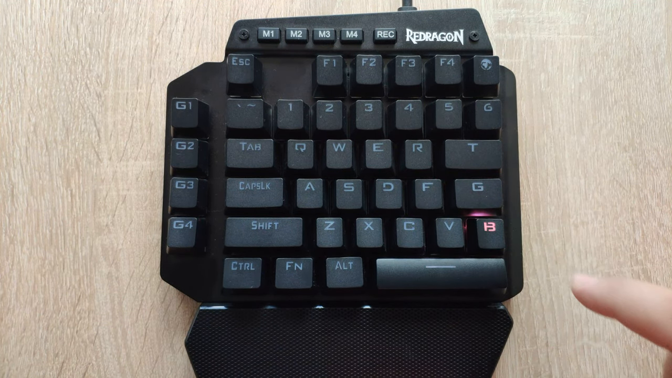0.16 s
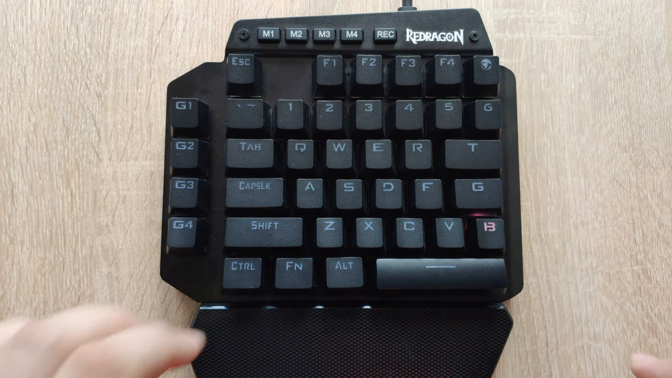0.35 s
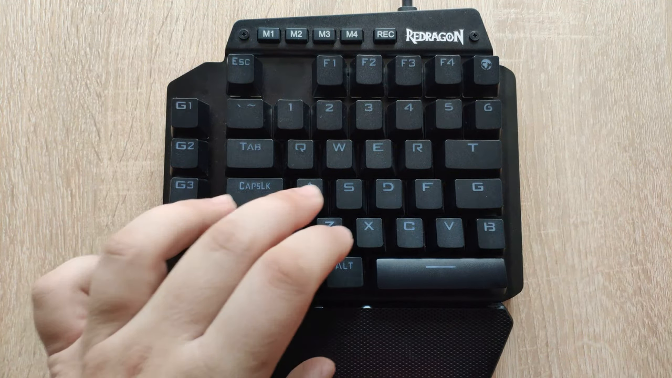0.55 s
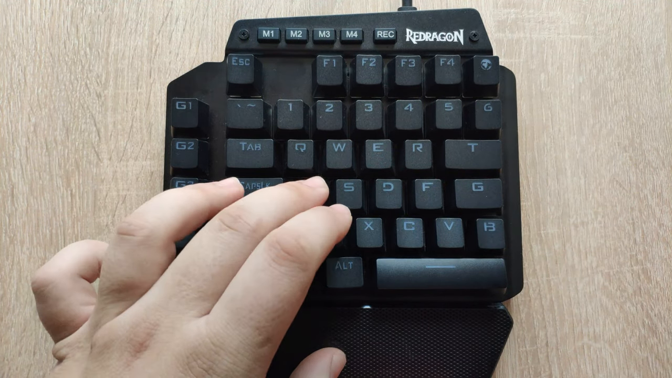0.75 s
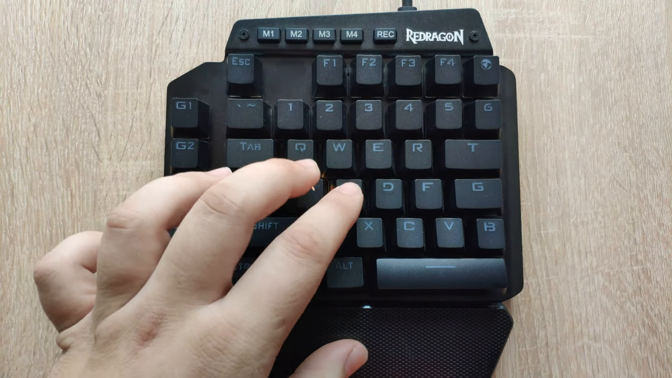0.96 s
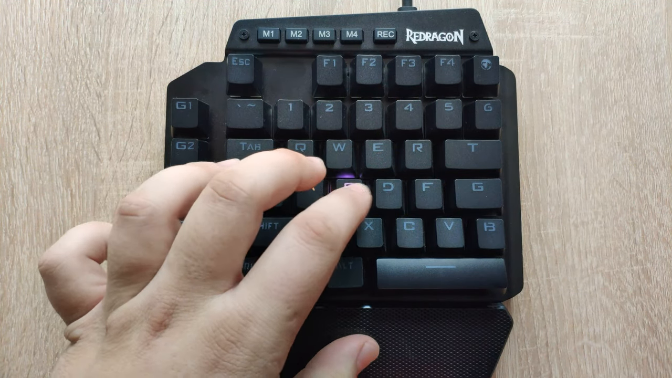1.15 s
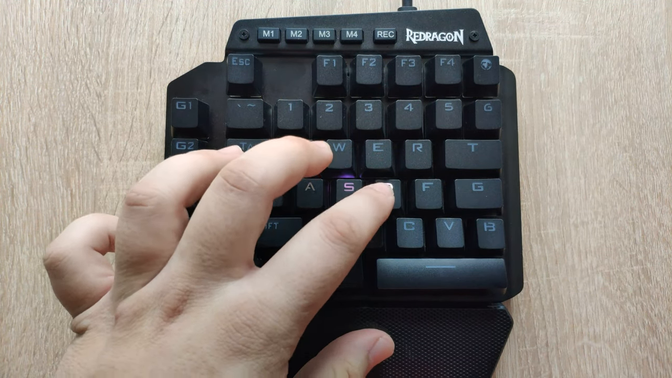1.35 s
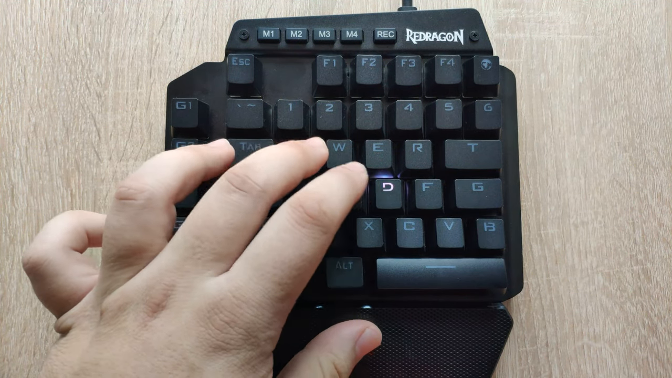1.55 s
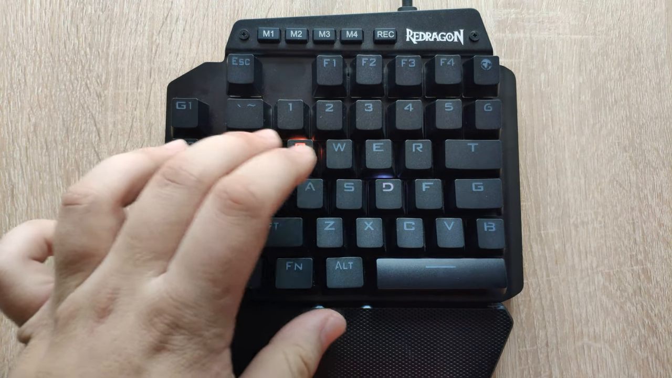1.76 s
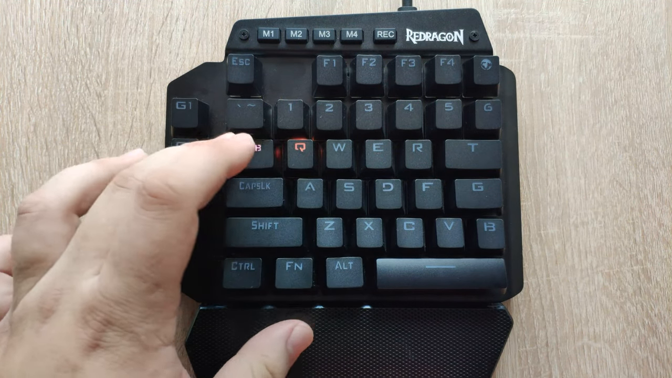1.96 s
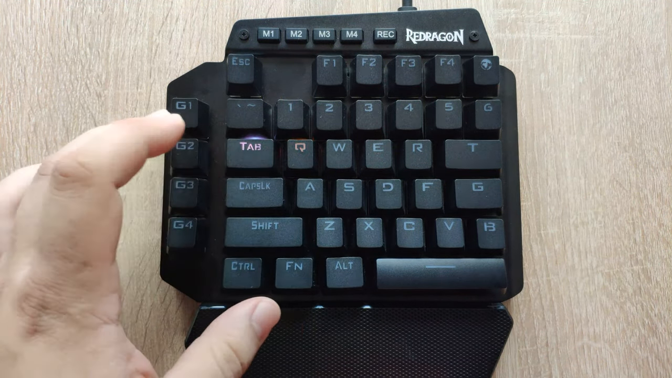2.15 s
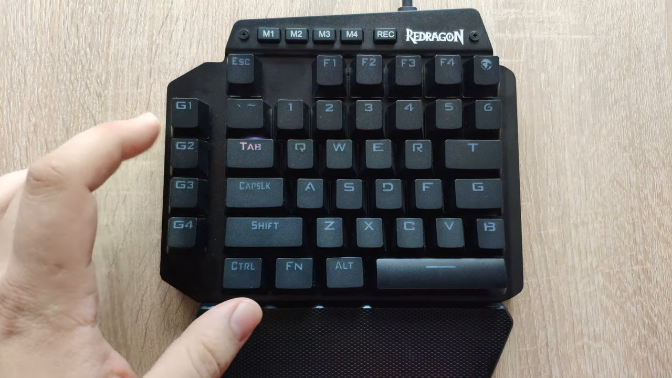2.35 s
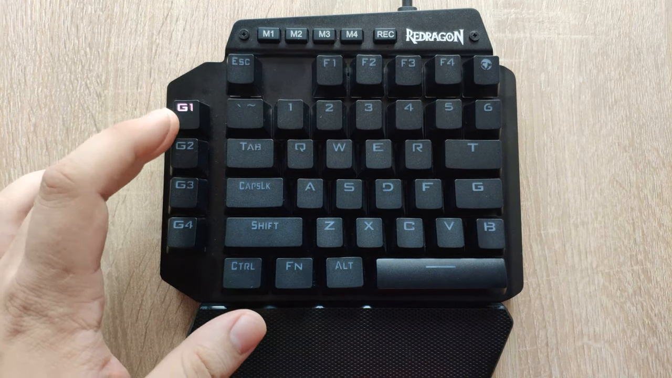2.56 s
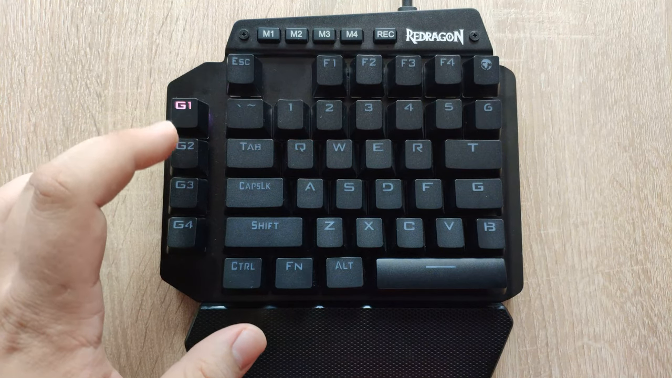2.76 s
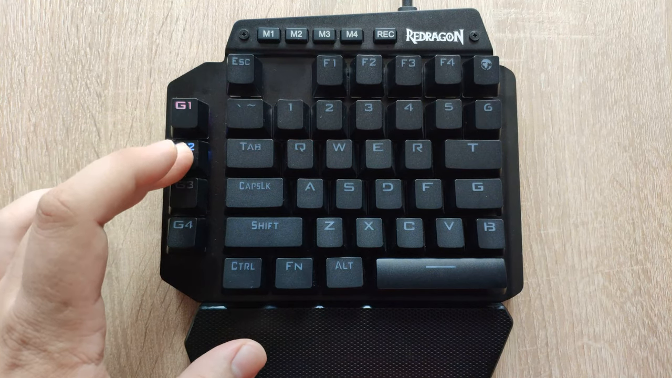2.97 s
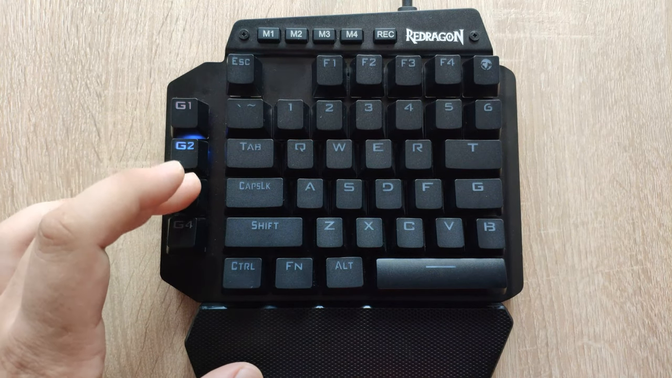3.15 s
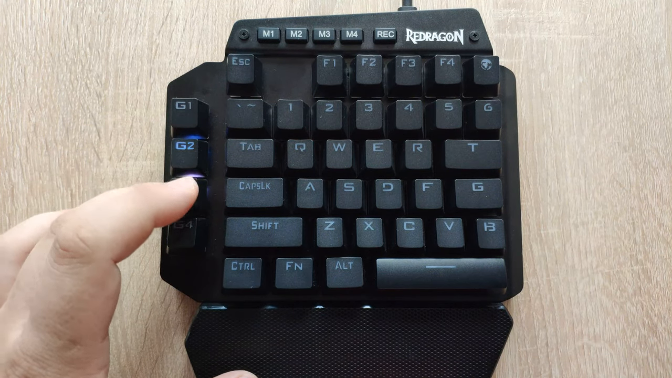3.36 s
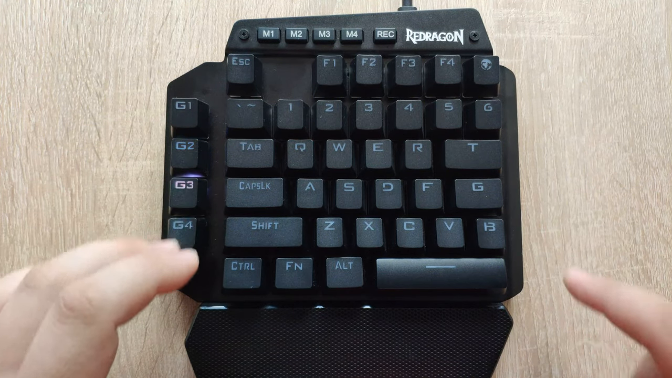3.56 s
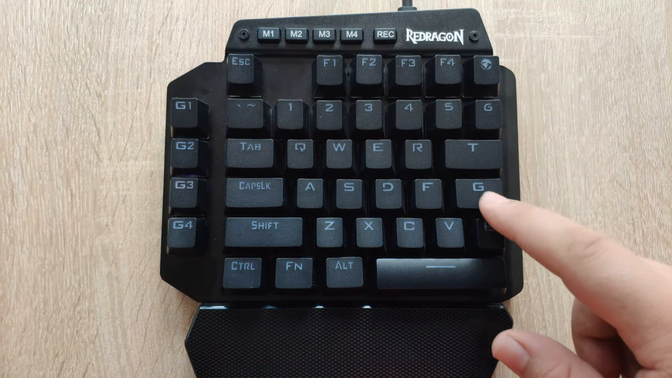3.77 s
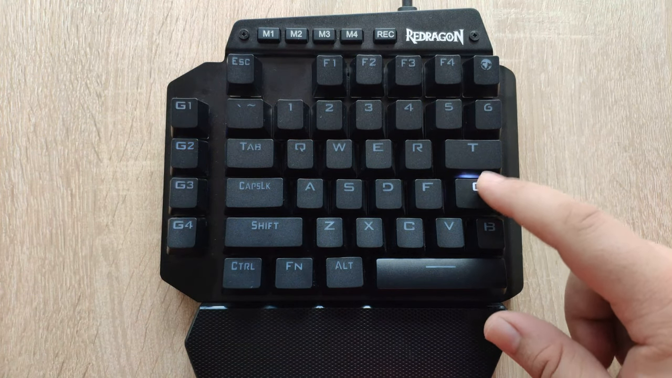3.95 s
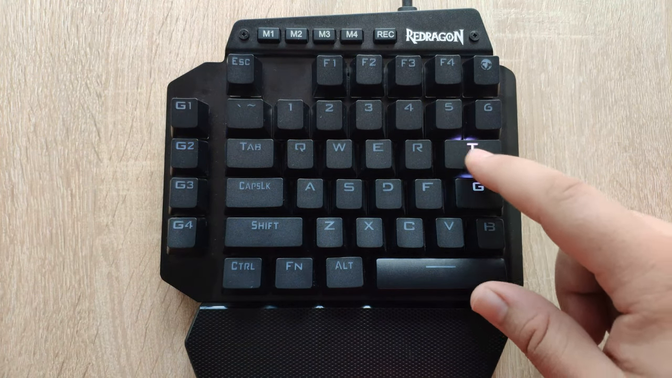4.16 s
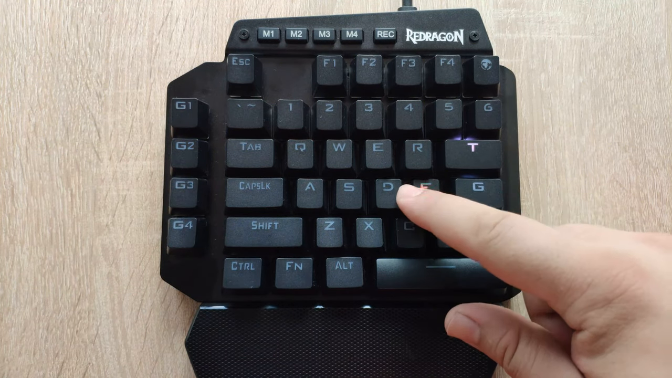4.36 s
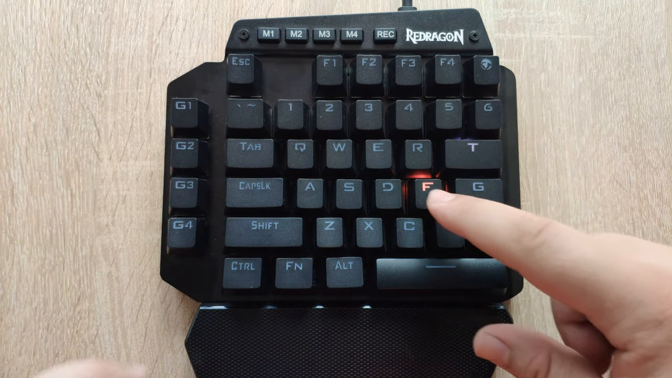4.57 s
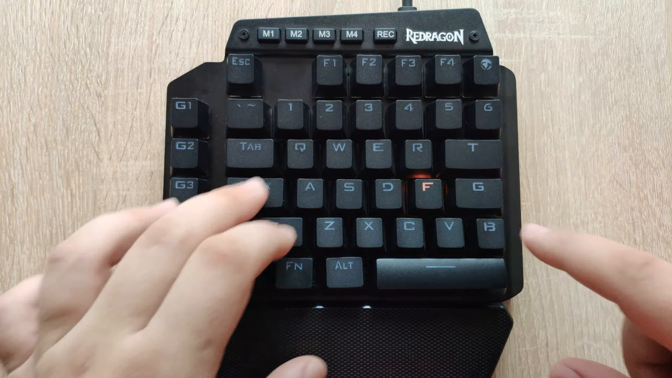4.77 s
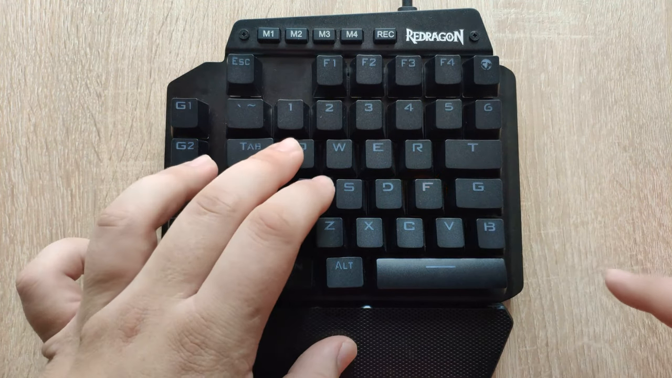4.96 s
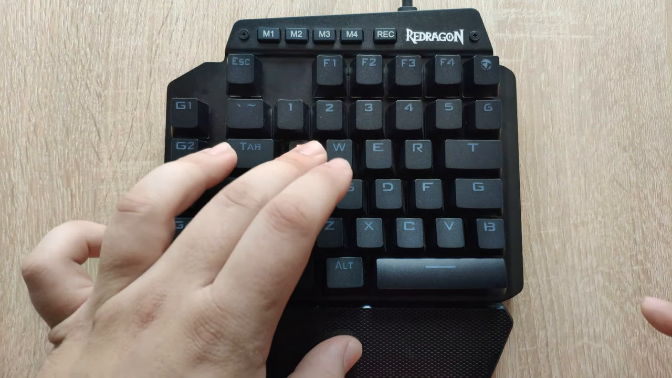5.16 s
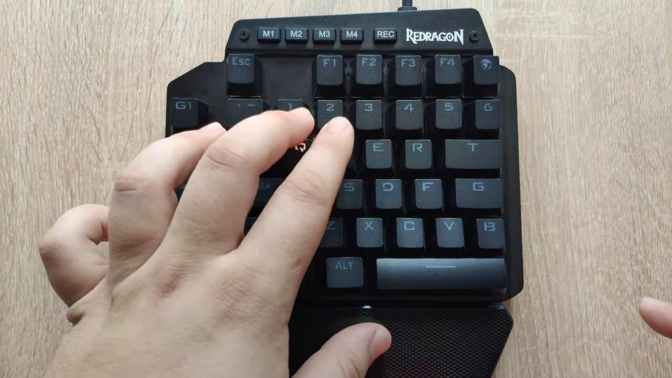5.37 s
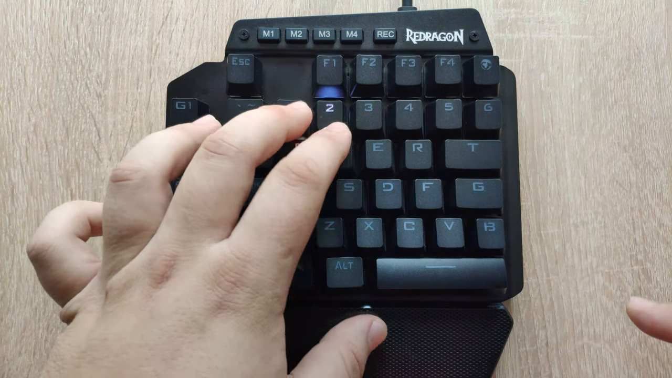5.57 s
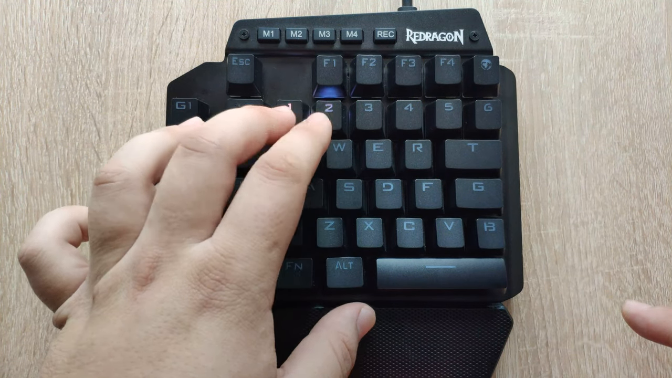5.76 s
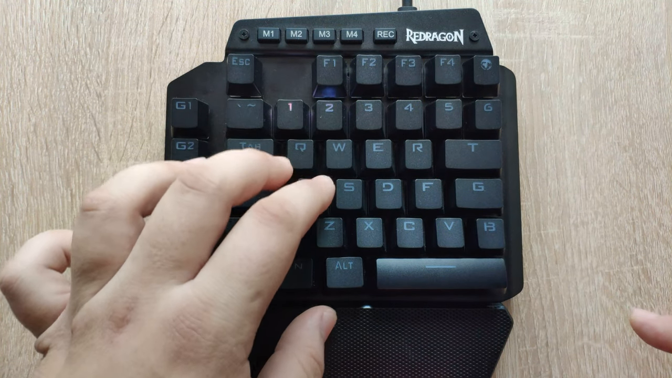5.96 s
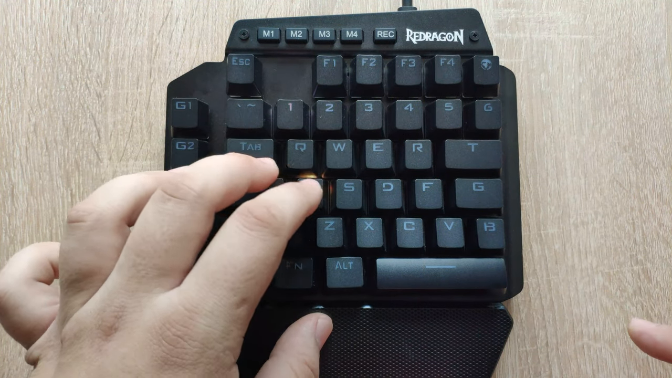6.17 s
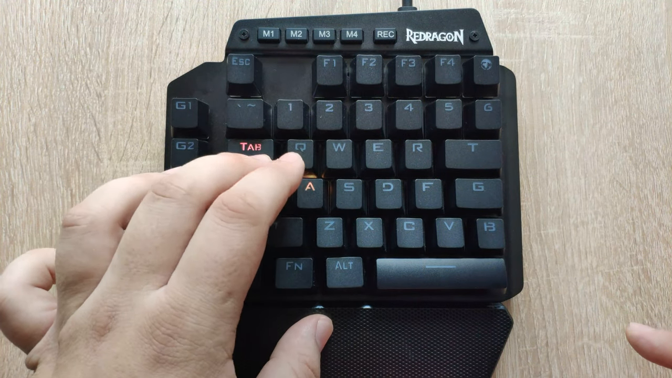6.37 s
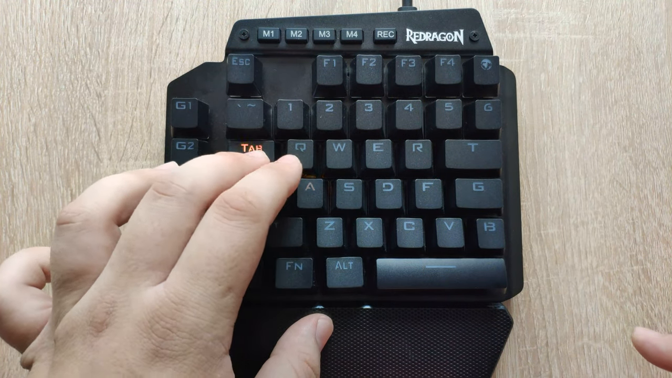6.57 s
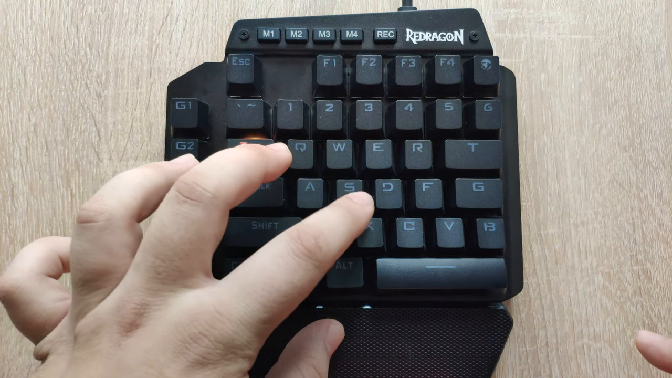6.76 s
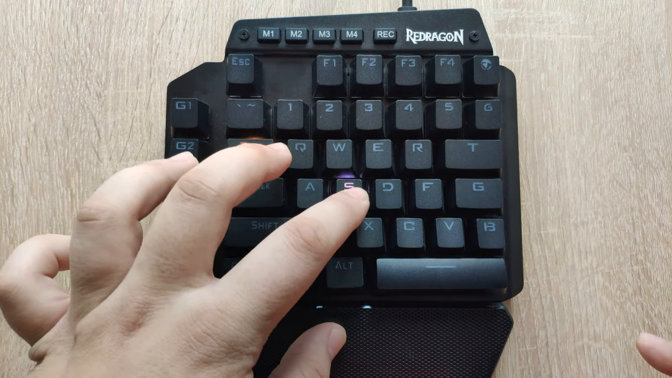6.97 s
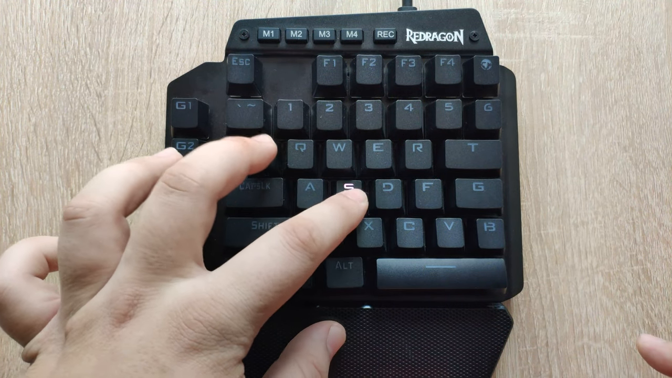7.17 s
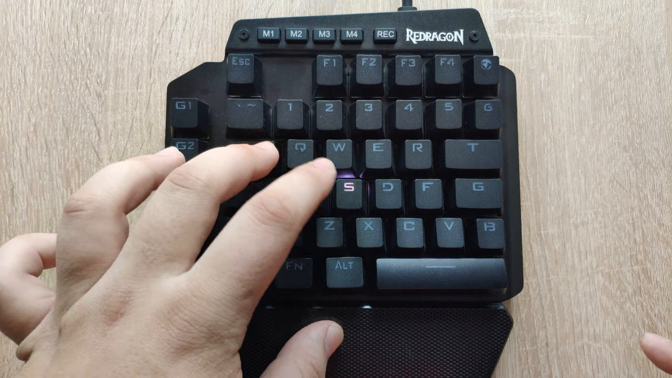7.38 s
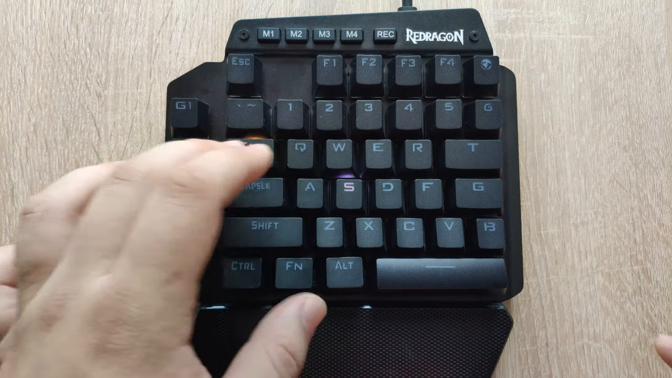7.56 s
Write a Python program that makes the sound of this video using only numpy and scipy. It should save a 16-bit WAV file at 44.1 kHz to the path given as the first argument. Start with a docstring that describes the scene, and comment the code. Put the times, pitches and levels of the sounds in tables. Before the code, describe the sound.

Mechanical keyboard keys click crisply and clack back up, about three presses a second with a few short pauses.

```python
"""Sharp clicks and clacks: one hand presses the keys of a small mechanical keypad on a wooden desk.
On each press the switch's click jacket snaps, and a firm press bottoms the keycap out on the plate; on
release the key knocks against its top stop. Fingers land and stems tick in between. Each impact excites
damped modes of the keypad. Behind it are a bare room's reverberation, a faint mains hum and air noise,
and this whole background sinks in three of the pauses."""
import sys
import numpy as np
from scipy import signal
from scipy.fft import rfft, irfft
from scipy.io import wavfile

SR = 44100
rng = np.random.default_rng(int(sys.argv[2]) if len(sys.argv) > 2 else 0)


def transcribe(u):
    """Save the signal u as a 16-bit wav file named by the first command-line argument.

    u: samples, shape (n,) or (channels, n), limited to [-1, 1]; the rate is SR.
    q: integer samples, one column per channel.
    """
    v = np.clip(np.atleast_2d(u).T, -1, 1)
    q = np.round(v * 32767).astype(np.int16)
    wavfile.write(sys.argv[1], SR, q)


N = 336042

# snaps of the click jacket: (time [s], ring level [dB], ring frequency [Hz], housing crack level [dB],
# top edge level [dB], left minus right [dB])
SNAPS = [(0.7458, -24.5, 8370, -37.5, -44, 3.5), (1.0518, -21.5, 8480, -37.5, -44.5, 6),
         (1.3462, -24, 8230, -35.5, -43, -6.5), (1.642, -21, 8100, -37, -43, -3),
         (1.984, -31.5, 8690, -28.5, -43, -2.5), (2.609, -26, 7890, -35.5, -41.5, 3),
         (2.9593, -27.5, 8460, -31, -41, 1.5), (3.251, -21.5, 8500, -31.5, -46, 9),
         (3.8907, -31.5, 8930, -33, -42.5, 4.5), (4.1431, -31.5, 8620, -28.5, -37, 3.5),
         (4.4308, -20, 7900, -33.5, -37.5, -1.5), (5.186, -21.5, 8320, -36, -41, 0.5),
         (5.5042, -24.5, 8060, -36, -43, -0.5), (5.6696, -25, 8440, -34, -44.5, 2),
         (6.074, -22.5, 8360, -34.5, -42, 6.5), (6.3438, -24.5, 8090, -29, -42, -0.5),
         (6.5771, -25, 8400, -31.5, -44, 1.5), (6.87, -24.5, 8110, -32, -42, 0.5),
         (7.179, -20, 8200, -39, -43, 4.5), (7.3694, -29, 8600, -28, -46, 2.5)]
# modes of the case and of the stem: (frequency [Hz], bandwidth [Hz], gain [dB])
CASE_MODES = [(215, 80, -7.5), (488, 140, -2.5), (570, 31, 5.5), (639, 77, 4), (861, 200, 6.5)]
STEM_MODES = [(4540, 2200, -4.5), (7320, 830, -1), (8400, 910, -1.5), (12500, 1800, -26),
              (14800, 4500, -16.5)]


def clicks(ring_width_hz=480, skirt_width_hz=1500, rebound_s=.001, rebound_db=-11, case_db=-58.5):
    """Impulse excitation: the jacket snaps, rebounds once and rings near 8 kHz, jolting the housing."""
    # modes of the switch housing and of its top edge: (frequency [Hz], bandwidth [Hz], gain [dB])
    housing_modes = [(2300, 1000, -2.5), (3400, 1300, -4.5), (4430, 680, -4), (7070, 890, 4)]
    edge_modes = [(10950, 2300, -5.5), (13200, 3700, -1), (15800, 470, 0)]
    out = np.zeros((2, N))
    for s, ring_db, hz, crack_db, edge_db, pan_db in SNAPS:
        snap = contact(chatter_db=-6, chatter_t60=.014, correlation=.85)
        snap[:, int(rebound_s * rng.uniform(.7, 1.3) * SR)] += from_db(rebound_db)
        # two resonators in series make the ring swell briefly before it decays
        ring = resonate(resonate(snap, hz, ring_width_hz), hz, skirt_width_hz)
        jolt = contact(chatter_db=6, chatter_t60=.018, correlation=1)
        crack = band(modal_response(jolt, housing_modes, spread_db=2.5), 1100, 7500)
        scrape = contact(chatter_db=2, chatter_t60=.011, correlation=.5)
        edge = band(modal_response(scrape, edge_modes, spread_db=4.5), 9500, 21000)
        case = band(modal_response(snap, CASE_MODES), 500, 1800)
        click = at_level(ring, ring_db) + at_level(crack, crack_db)
        click += at_level(edge, edge_db) + at_level(case, case_db)
        add_hit(out, s, click, pan_db, right_lag_s=rng.uniform(.00003, .00022))
    return out


def knocks(other_modes_db=-9):
    """Free vibration after a blow: the keycap clacks, plate and case ring, the switch parts rattle."""
    # modes of the plate: (frequency [Hz], bandwidth [Hz], gain [dB])
    plate_modes = [(1101, 140, 1.2), (1290, 250, -3), (1510, 290, 0.5), (1675, 330, -5.5)]
    out = np.zeros((2, N))
    for s, case_db, plate_db, plate_hz, cap_db, cap_hz, rattle_db in blows():
        thud = contact(chatter_db=-3, chatter_t60=.022, correlation=.7)
        case = band(modal_response(thud, CASE_MODES), 120, 1100)
        push = contact(chatter_db=-3, chatter_t60=.04, correlation=.6)
        mode_under_key = resonate(push, plate_hz, 250)
        other_modes = from_db(other_modes_db) * modal_response(push, plate_modes)
        plate = band(mode_under_key + other_modes, 650, 2400)
        clack = contact(chatter_db=-6, chatter_t60=.035, correlation=.3)
        cap = band(resonate(clack, cap_hz, 320), 1095, 3460)
        shake = contact(chatter_db=1, chatter_t60=.035, correlation=.25)
        rattle = band(modal_response(shake, STEM_MODES), 2800, 17000)
        knock = at_level(case, case_db) + at_level(plate, plate_db)
        knock += at_level(cap, cap_db) + at_level(rattle, rattle_db)
        add_hit(out, s, knock, pan_db=-1.2, right_lag_s=rng.uniform(.00002, .00016))
    return out


def blows(bounce_s=.0055, bounce_db=-8.5):
    """Energy partition: each kind of blow divides differently among case, plate, keycap and rattle."""
    # firm presses hit the bottom: (time [s], keycap level [dB], keycap frequency [Hz])
    bottomings = [(0.7618, -31.5, 2090), (1.0639, -29, 2340), (1.9977, -28, 2100), (2.6241, -34.5, 1700),
                  (2.9763, -34.5, 1900), (3.2617, -28.5, 1686), (3.904, -30.5, 2460), (4.1599, -33.5, 2440),
                  (5.7008, -42, 2300), (6.0901, -35.5, 2100), (6.5905, -28, 2170), (7.1965, -34.5, 2550),
                  (7.3811, -23, 2100)]
    # keys spring back against the top stop: (time [s], plate level [dB], hardness [dB],
    # plate frequency [Hz], keycap frequency [Hz], rattle level [dB])
    releases = [(0.0067, -43, -2.5, 1490, 2200, -47.5), (0.9079, -41.5, 1.5, 1040, 2090, -51),
                (1.2085, -36, 7, 1290, 2440, -44.5), (1.461, -38, -2, 1360, 2470, -51.5),
                (1.7574, -39.5, 0.5, 1010, 2170, -49), (2.0834, -38, 0.5, 1270, 2180, -49),
                (2.3914, -44, 0, 1730, 2160, -60.5), (2.7549, -38.5, -0.5, 1570, 1860, -50.5),
                (3.0998, -44, -1, 1490, 2200, -52.5), (3.444, -46, 1, 1540, 2140, -59),
                (3.5784, -46.5, 3, 1500, 1830, -52.5), (4.013, -40, -1, 1100, 2470, -43.5),
                (4.2406, -41.5, 3, 1280, 2730, -46), (4.2458, -36, -4, 950, 2520, -46),
                (4.496, -43, -2.5, 1250, 2480, -47), (4.5249, -38, 6, 1270, 2400, -54),
                (4.8963, -46, 1.5, 1310, 2330, -51.5), (4.9309, -45.5, -2.5, 1140, 2200, -55.5),
                (5.056, -45.5, 4.5, 1190, 2280, -59), (5.0837, -42.5, 2, 1320, 2360, -56.5),
                (5.3106, -38.5, 1.5, 1180, 2310, -52), (5.6563, -39.5, -1.5, 980, 2330, -53),
                (5.8372, -35, -0.5, 1230, 2190, -49.5), (5.874, -43.5, -0.5, 1020, 2300, -59.5),
                (6.1937, -39, -0.5, 1180, 2200, -46.5), (6.4835, -37.5, 1, 1150, 2170, -47.5),
                (6.7068, -36, -1, 1340, 2080, -46.5), (6.8138, -46.5, 3.5, 1490, 2200, -54),
                (7.01, -38.5, 4, 1260, 2580, -45), (7.2294, -36.5, 0, 1220, 2080, -44),
                (7.5697, -42.5, -2, 1133, 2100, -45), (7.5759, -39, 1.5, 1090, 2100, -52)]
    # fingers land on keycaps: (time [s], level [dB])
    touches = [(0.674, -61.5), (0.8793, -54.5), (0.9877, -53), (1.4267, -56), (1.5788, -47.5),
               (1.9142, -49.5), (1.9729, -53.5), (2.531, -59), (2.913, -54), (3.2022, -52.5),
               (4.1075, -48.5), (4.4071, -50.5), (4.489, -51.5), (4.846, -67.5), (5.0405, -50),
               (5.0743, -47.5), (5.1505, -52.5), (5.434, -50.5), (5.6055, -54.5), (5.6358, -55),
               (5.648, -46.5), (5.826, -53), (6.0058, -57.5), (6.176, -50.5), (6.186, -48), (6.9536, -51.5),
               (7.3476, -49.5)]
    # each blow: (time [s], case [dB], plate [dB], plate [Hz], keycap [dB], keycap [Hz], rattle [dB])
    for s, db, cap_hz in bottomings:
        yield s, db - 20, db - 6, 1626, db, cap_hz, db - 12   # the finger damps the body
    for release_s, plate_db, hard_db, plate_hz, cap_hz, rattle_db in releases:
        again_s = release_s + bounce_s * rng.uniform(.7, 1.1)   # the freed key hits its stop once more
        for s, gain_db in (release_s, 0), (again_s, bounce_db):
            db = plate_db + gain_db
            # a hard stop gives more to the keycap and less to the case
            yield s, db - 7 - hard_db, db, plate_hz, db + hard_db, cap_hz, rattle_db + gain_db
    for s, db in touches:
        yield s, db - 7.5, db, 1340, db, 2380, db - 8.5


def ticks(catch_lead_s=.014, catch_db=-58.5, cap_share_db=-11):
    """Weak impacts excite only stem and keycap: the stem catches the jacket, or the jacket slips."""
    # the jacket slips on the stem, mostly as a key rises: (time [s], stem level [dB])
    slips = [(0.8719, -49.5), (1.191, -50), (1.205, -41), (1.3124, -48), (1.4593, -42), (1.5793, -47),
             (1.734, -46.5), (3.0957, -45), (3.4374, -56), (3.993, -48.5), (4.226, -46.5), (4.4072, -45),
             (4.521, -44.5), (5.6059, -54), (5.647, -44), (5.814, -49.5), (6.458, -46.5), (6.69, -47),
             (7.3473, -49), (7.5388, -47.5)]
    catches = [(s - catch_lead_s, catch_db) for s, *_ in SNAPS]
    out = np.zeros((2, N))
    for s, stem_db in catches + slips:
        touch = contact(chatter_db=-.5, chatter_t60=.01, correlation=.21)
        stem = modal_response(touch, STEM_MODES)
        cap = band(resonate(touch, 3100, 1200), 800, 3500)
        add_hit(out, s, at_level(stem, stem_db) + at_level(cap, stem_db + cap_share_db), pan_db=-2.5)
    return out


def contact(chatter_db, chatter_t60, correlation, bounces_per_s=4000):
    """Impact force: a unit impulse, then the tiny, exponentially dying bounces of loose plastic."""
    t = np.arange(int(.08 * SR)) / SR
    bounces = rng.random(len(t)) < bounces_per_s / SR
    chatter = bounces * stereo_noise(len(t), correlation) * from_db(-60 * t / chatter_t60)
    return (t == 0) + from_db(chatter_db) * chatter / np.sqrt(np.sum(chatter ** 2) / 2)


def modal_response(force, modes, spread_db=3, detune=.021):
    """Modal superposition: keys sit at different spots, so each blow weights and shifts modes anew."""
    out = 0
    for k, (hz, width_hz, db) in enumerate(modes):
        gain_draw, pitch_draw = rng.standard_normal(2)
        gain = (-1) ** k * from_db(db + spread_db * gain_draw)
        out = out + gain * resonate(force, hz * np.exp(detune * pitch_draw), width_hz)
    return out


def after_ring(keys):
    """Sympathetic resonance: fed by every blow, springs and plate sing on between the strokes."""
    # lightly damped modes: (frequency [Hz], bandwidth [Hz], gain [dB])
    narrow_modes = [(592, 12, 2.5), (1490, 7, -8.5), (2090, 11, -10), (2400, 8, -6), (2310, 7, -8),
                    (2470, 8, -13.5)]
    return sum(from_db(db) * resonate(keys, hz, width_hz) for hz, width_hz, db in narrow_modes)


def room(source, build_s=.0015):
    """Reverberation: one side of the keypad reaches both microphones as echoes and a diffuse tail."""
    # decay of the tail: (frequency [Hz], time to fall 60 dB [s])
    decay_times = [(150, 0.3), (600, 0.42), (2200, 0.45), (5000, 0.37), (8500, 0.43), (15000, 0.43)]
    # tail against direct sound: (frequency [Hz], level [dB])
    tail_levels = [(150, -4), (600, -6.5), (1200, -11), (2400, -15), (4500, -9), (8500, -11.5),
                   (11000, -10.5), (15000, -13.5)]
    # reflections from near surfaces: (delay [s], left level [dB], right level [dB])
    reflections = [(.0068, -29, -22.5), (0.0108, -18.5, -32.5), (0.017, -29.5, -22.5)]
    t = np.arange(int(.8 * SR)) / SR
    edges_hz = np.geomspace(100, 18000, 16)
    response = np.zeros((2, len(t)))
    for low, high in zip(edges_hz, edges_hz[1:]):
        hz = np.sqrt(low * high)
        decay = from_db(-60 * t / at_hz(decay_times, hz)) * (1 - np.exp(-t / build_s))
        noise = band(stereo_noise(len(t), correlation=1 / (1 + (hz / 1100) ** 2)), low, high)
        response += from_db(at_hz(tail_levels, hz)) * noise * decay / np.sqrt(np.sum(decay ** 2))
    for delay_s, left_db, right_db in reflections:
        response[:, round(delay_s * SR)] += from_db([left_db, right_db])
    return signal.fftconvolve(source[None], response, axes=1)[:, :N]


def hum(wavers_per_s=9):
    """Random amplitude and phase modulation makes the partials of a mains hum waver."""
    # hum partials: (frequency [Hz], rms level [dB], waver depth [dB])
    partials = [(99.9, -68, .7), (203.4, -70, 2.9), (612, -73, 2.5)]
    t = np.arange(N) / SR
    knots_s = np.arange(0, N / SR + 1, 1 / wavers_per_s)
    out = 0
    for hz, db, waver_db in partials:
        waver, sway = (np.interp(t, knots_s, rng.standard_normal(len(knots_s))) for _ in range(2))
        phase = 2 * np.pi * hz * t + .19 * waver_db * sway
        out = out + np.sqrt(2) * from_db(db + waver_db * waver) * np.sin(phase)
    return out


def air(rms_db=-63):
    """Stationary room noise, most coherent between the two sides in the bass."""
    # spectrum of the room air: (frequency [Hz], relative spectral density [dB])
    spectrum = [(25, -9.5), (50, 5), (75, -1.5), (150, 4.5), (190, -0.5), (230, 6.5), (330, -1.5),
                (600, -4.5), (1200, -8.5), (2600, -9), (3800, -18.5), (8000, -23.5), (15000, -28)]
    hz = np.arange(N // 2 + 1) * SR / N
    mid, side = rfft(rng.standard_normal((2, N))) * from_db(at_hz(spectrum, hz))
    side *= from_db(at_hz([(100, -8.5), (600, -3.5), (2500, 1.0)], hz))
    noise = irfft(np.array([mid + side, mid - side]), N)
    return from_db(rms_db) * noise / noise.std()


def background_dips(sink_s=.12, recover_s=.06):
    """Trapezoidal envelope in dB: the background sinks in a pause and is back by the next stroke."""
    # dips in level: (start time [s], end time [s], depth [dB])
    pauses = [(0.153, 0.743, -15.5), (3.669, 3.883, -16.5), (4.665, 4.907, -13)]
    t = np.arange(N) / SR
    return sum(depth_db * np.clip(np.minimum((t - start) / sink_s, (end - t) / recover_s), 0, 1)
               for start, end, depth_db in pauses)


def resonate(x, hz, width_hz):
    """Damped oscillator: a two-pole resonance with unit peak gain."""
    radius = np.exp(-np.pi * width_hz / SR)
    feedforward = np.array([1, 0, -1]) * (1 - radius ** 2) / 2
    feedback = [1, -2 * radius * np.cos(2 * np.pi * hz / SR), radius ** 2]
    return signal.lfilter(feedforward, feedback, x + 1e-18)


def band(x, low_hz, high_hz):
    """Causal band-pass filtering."""
    sections = signal.butter(2, [low_hz, min(high_hz, .45 * SR)], "band", fs=SR, output="sos")
    return signal.sosfilt(sections, x)


def stereo_noise(size, correlation):
    """Partial coherence: common and opposed white noise mix to the given correlation."""
    mid, side = rng.standard_normal((2, size))
    return np.sqrt((1 + correlation) / 2) * mid + np.sqrt((1 - correlation) / 2) * np.array([side, -side])


def add_hit(out, s, hit, pan_db, right_lag_s=.0001):
    """Level and arrival-time differences place a hit at time s between the two microphones."""
    gains = from_db(np.array([pan_db, -pan_db]) / 2)
    for channel, gain in enumerate(gains / np.sqrt(np.mean(gains ** 2))):
        start = max(0, round((s + channel * right_lag_s) * SR))
        piece = hit[channel, :N - start]
        out[channel, start:start + len(piece)] += gain * piece


def at_level(hit, db):
    """Normalisation to an rms level over the first 10 ms."""
    return hit * from_db(db) / np.sqrt(np.mean(hit[:, :SR // 100] ** 2))


def at_hz(points, hz):
    """Interpolation on a log-frequency axis."""
    knots_hz, values = np.transpose(points)
    return np.interp(np.log(np.maximum(hz, 1)), np.log(knots_hz), values)


def from_db(db):
    """Decibels to amplitude ratio."""
    return 10 ** (np.asarray(db) / 20)


def scene():
    """Superposition of direct sound and background; the hum sinks less than the rest in the pauses."""
    keys = clicks() + knocks() + ticks()
    background = room(keys[0]) + room(keys[1]) + after_ring(keys) + air()
    dip_db = background_dips()
    return keys + from_db(dip_db) * background + from_db(.92 * dip_db) * hum()


def record(dry, cutoff_hz=16200):
    """Port resonances colour each microphone; a steep low-pass cuts the top."""
    # peaks and dips of the ports, left then right: (frequency [Hz], bandwidth [Hz], gain [dB])
    ports = [
        [(4100, 3200, 3.5), (6900, 1600, 2), (8680, 4200, -13), (11870, 1700, -8)],
        [(2200, 700, 3), (5300, 1300, -2.5), (9170, 820, 7.5), (13200, 3100, 4)],
    ]
    heard = []
    for channel, port in zip(dry, ports):
        for hz, width_hz, db in port:
            channel = channel + (from_db(db) - 1) * resonate(channel, hz, width_hz)
        heard.append(channel)
    return signal.sosfilt(signal.ellip(10, .1, 80, cutoff_hz, fs=SR, output="sos"), heard)


dry = scene()
out = record(dry)
transcribe(out)
```